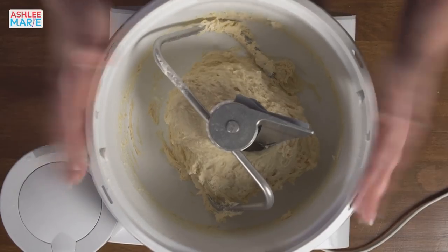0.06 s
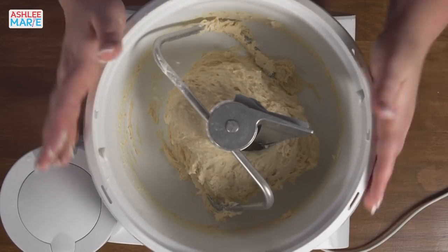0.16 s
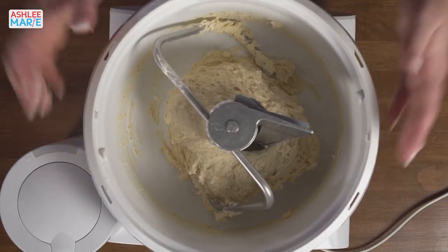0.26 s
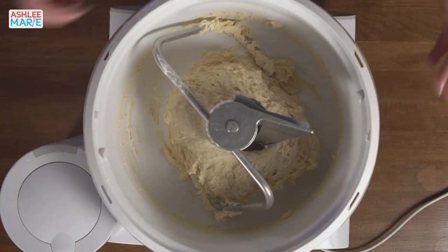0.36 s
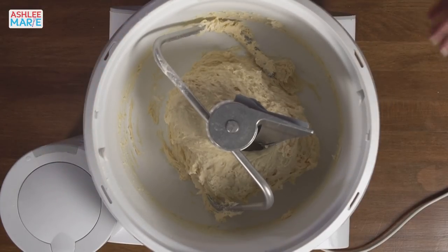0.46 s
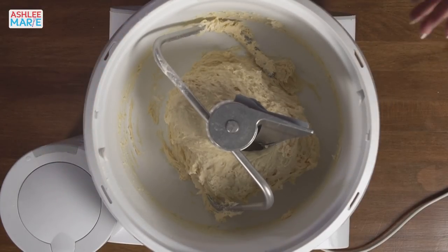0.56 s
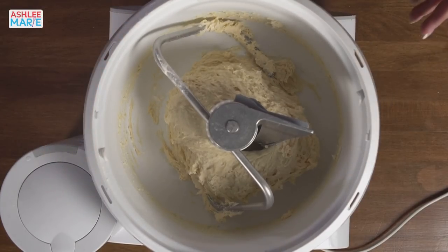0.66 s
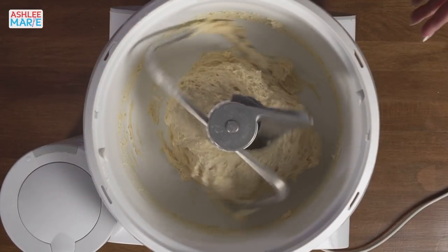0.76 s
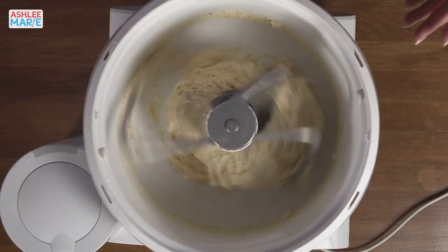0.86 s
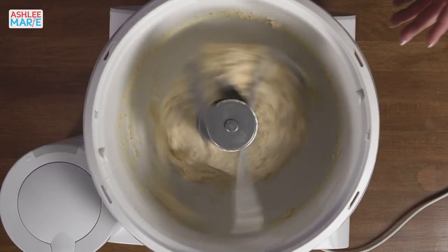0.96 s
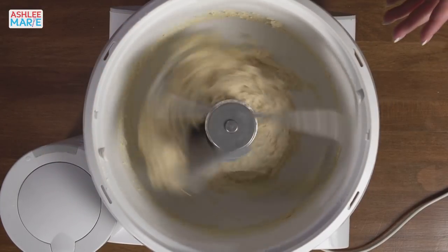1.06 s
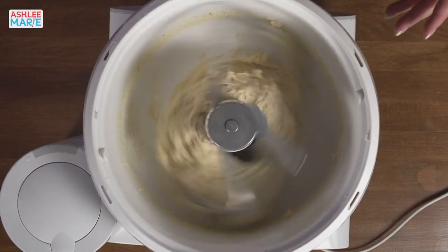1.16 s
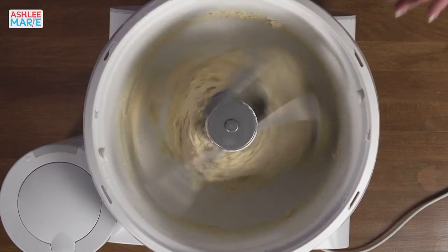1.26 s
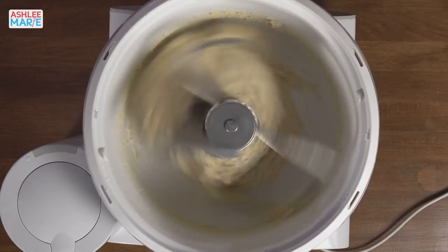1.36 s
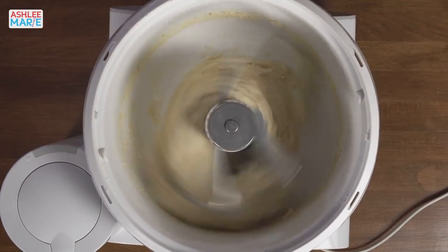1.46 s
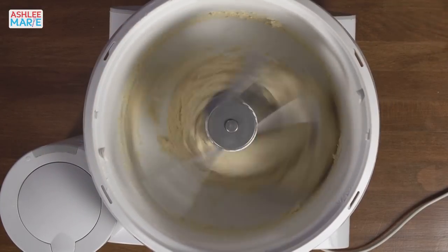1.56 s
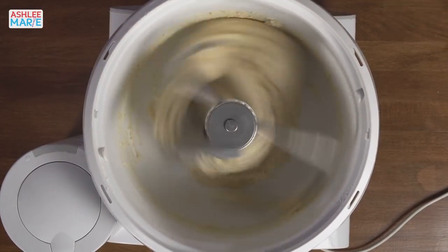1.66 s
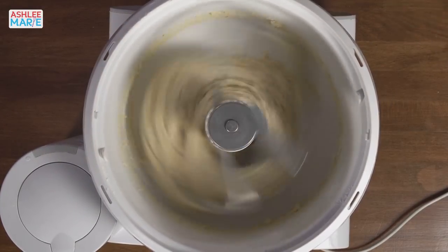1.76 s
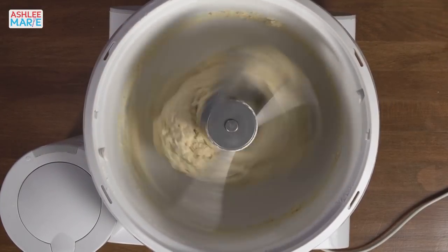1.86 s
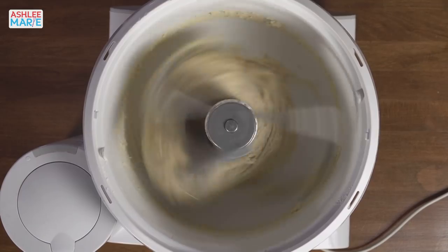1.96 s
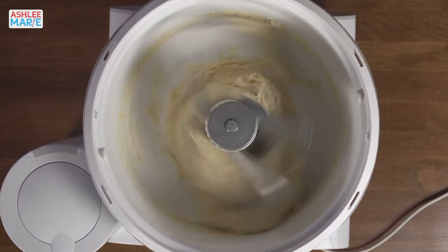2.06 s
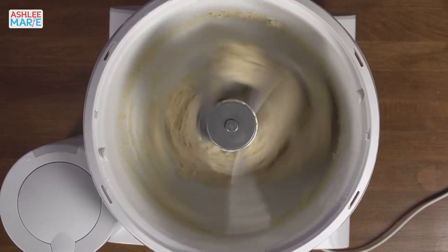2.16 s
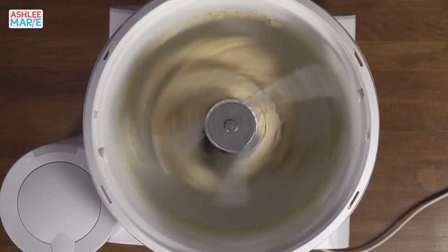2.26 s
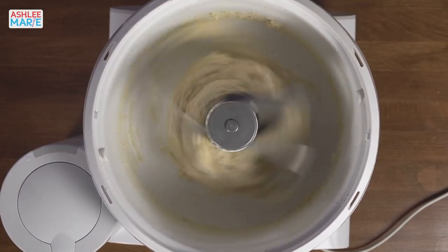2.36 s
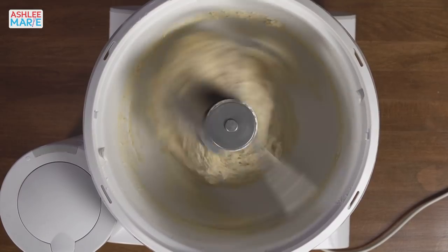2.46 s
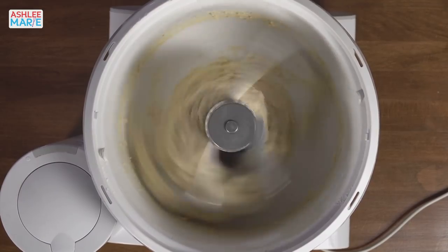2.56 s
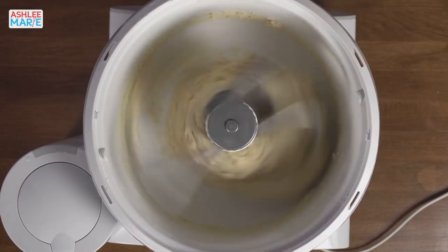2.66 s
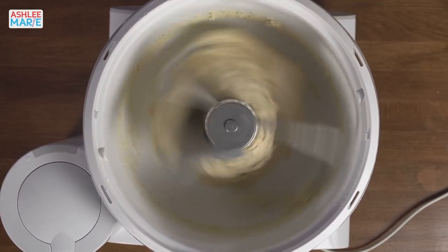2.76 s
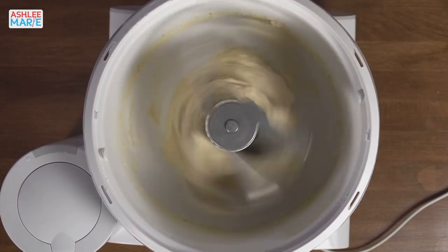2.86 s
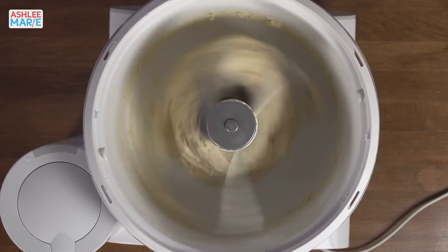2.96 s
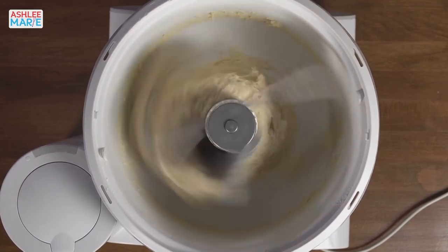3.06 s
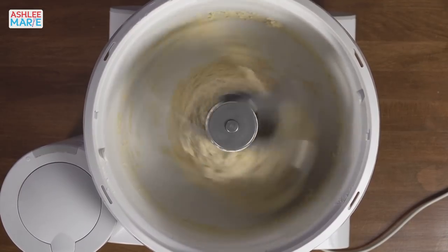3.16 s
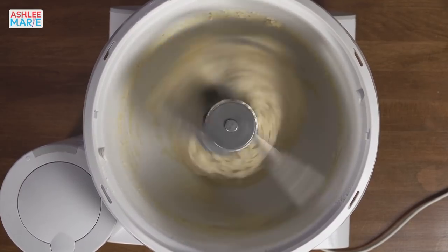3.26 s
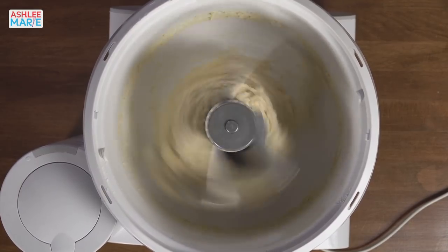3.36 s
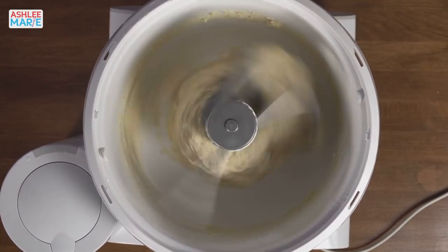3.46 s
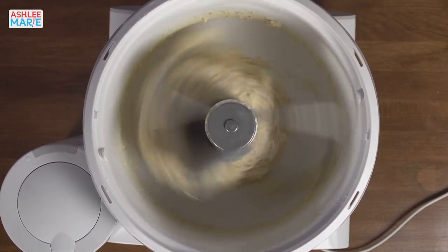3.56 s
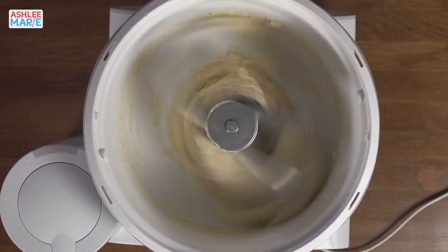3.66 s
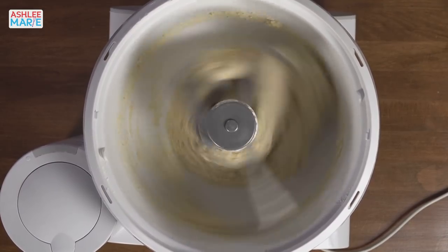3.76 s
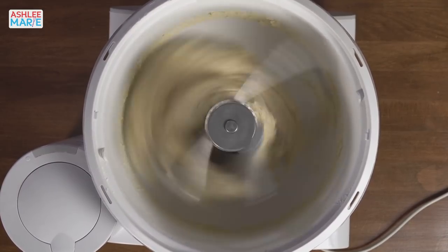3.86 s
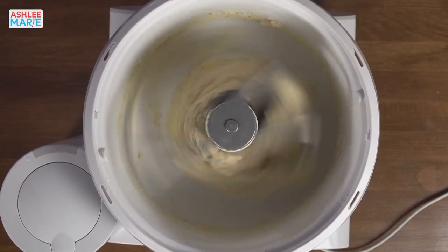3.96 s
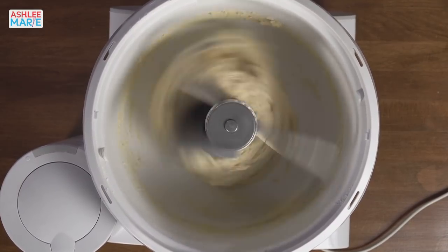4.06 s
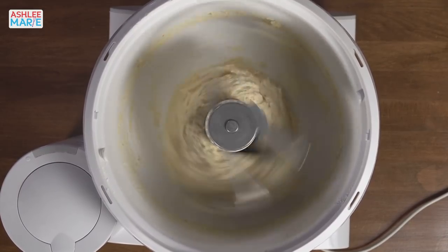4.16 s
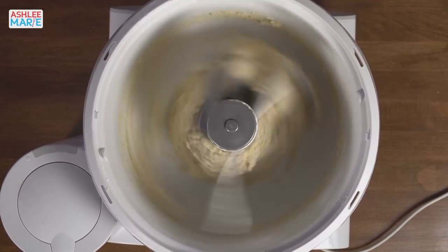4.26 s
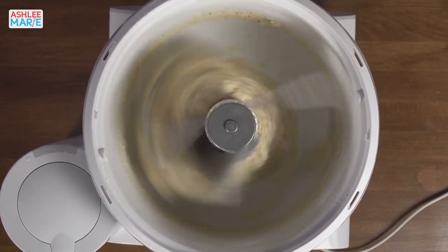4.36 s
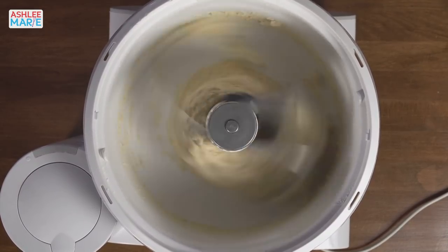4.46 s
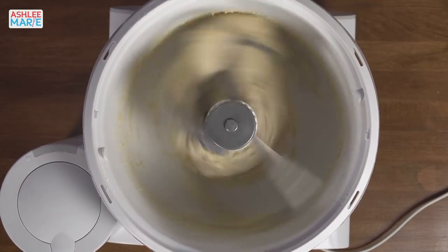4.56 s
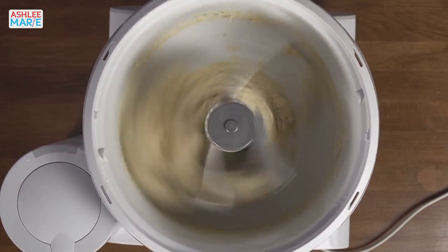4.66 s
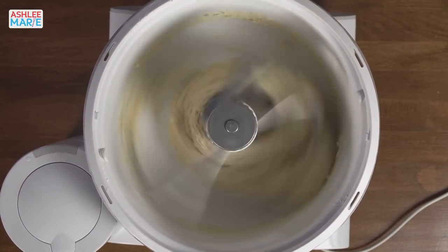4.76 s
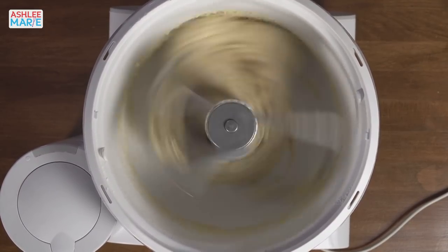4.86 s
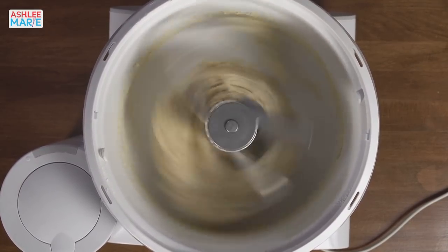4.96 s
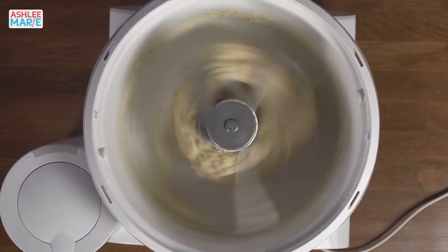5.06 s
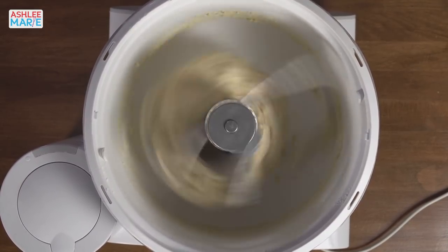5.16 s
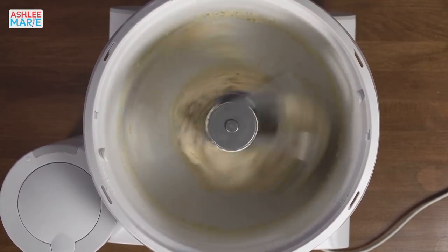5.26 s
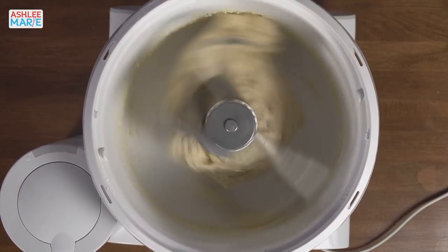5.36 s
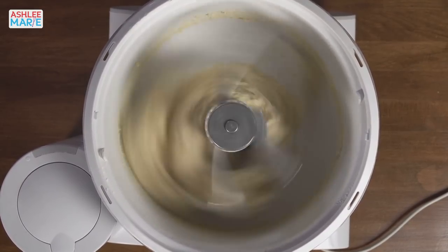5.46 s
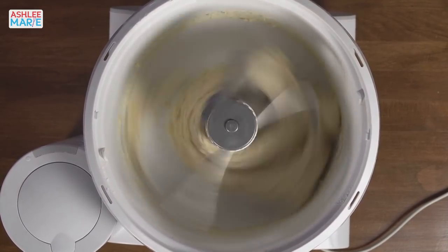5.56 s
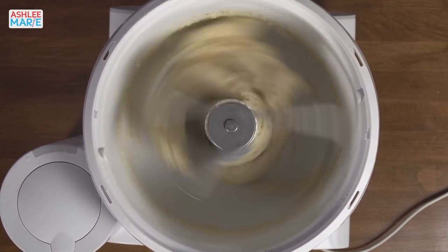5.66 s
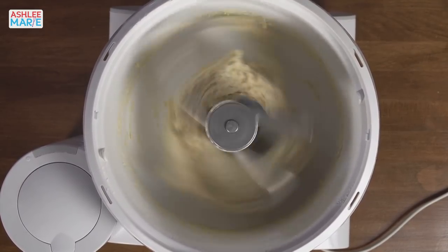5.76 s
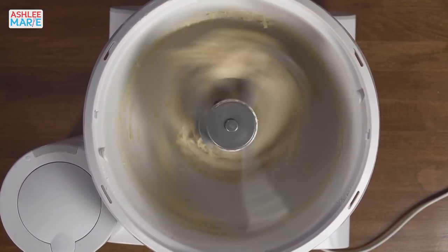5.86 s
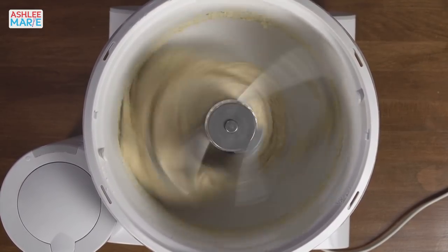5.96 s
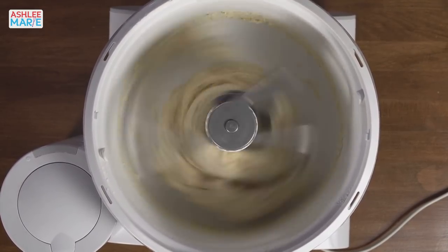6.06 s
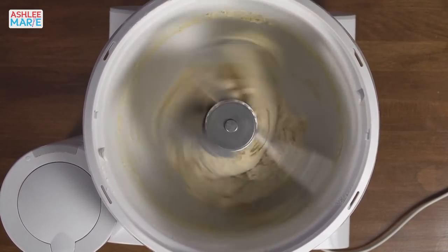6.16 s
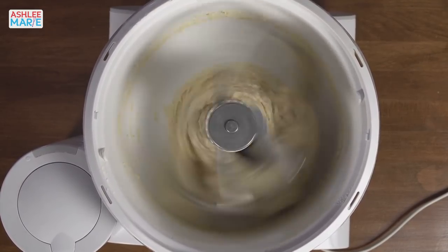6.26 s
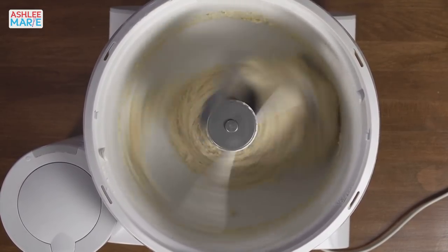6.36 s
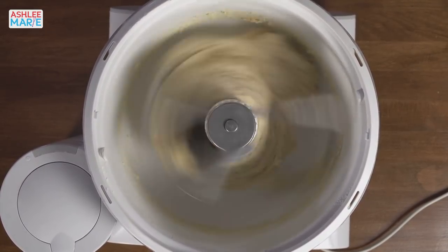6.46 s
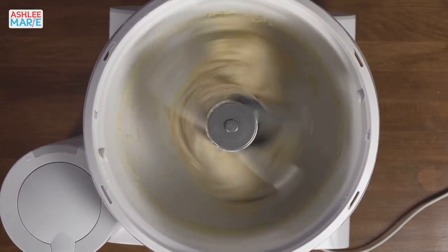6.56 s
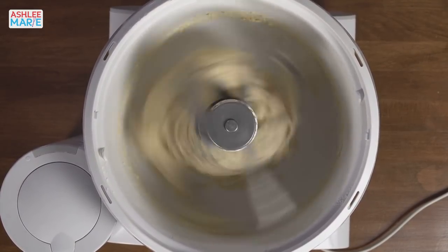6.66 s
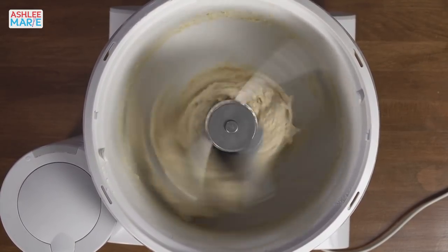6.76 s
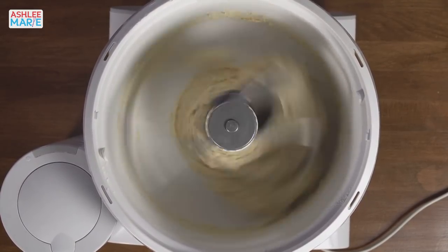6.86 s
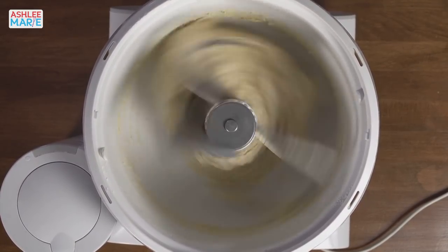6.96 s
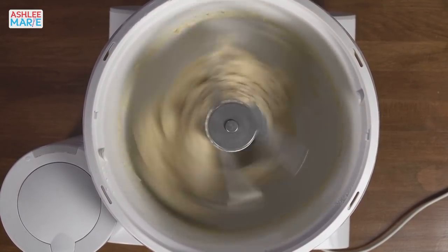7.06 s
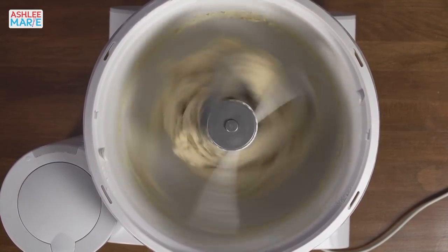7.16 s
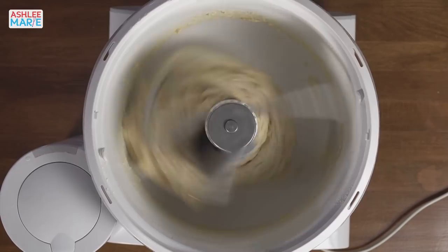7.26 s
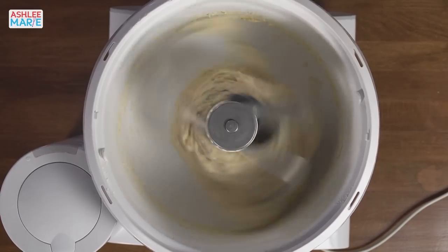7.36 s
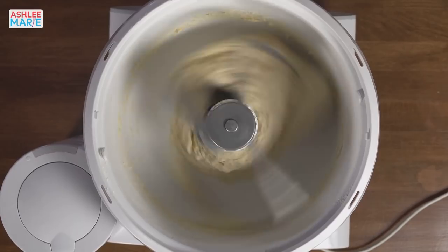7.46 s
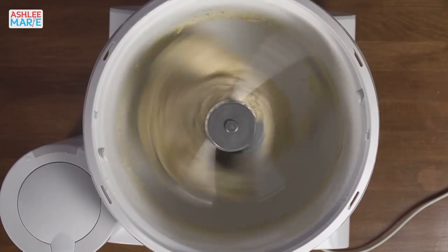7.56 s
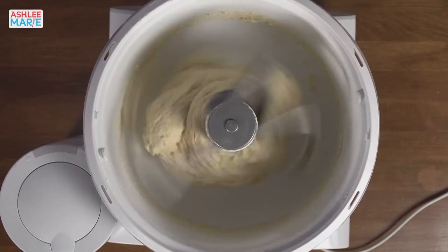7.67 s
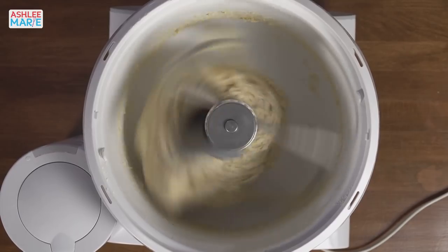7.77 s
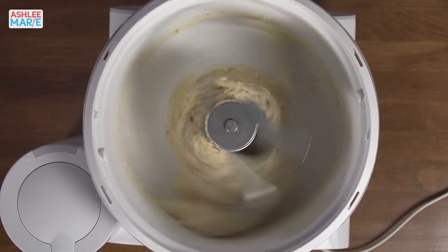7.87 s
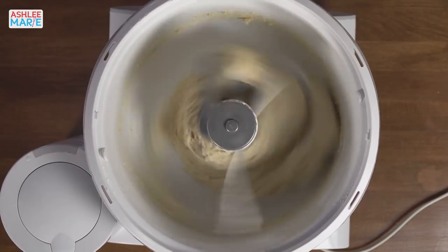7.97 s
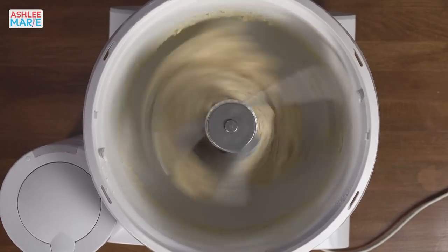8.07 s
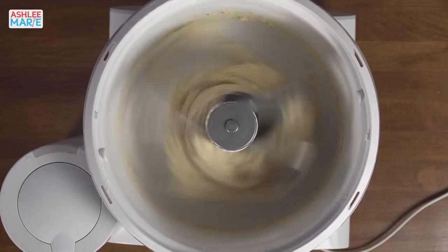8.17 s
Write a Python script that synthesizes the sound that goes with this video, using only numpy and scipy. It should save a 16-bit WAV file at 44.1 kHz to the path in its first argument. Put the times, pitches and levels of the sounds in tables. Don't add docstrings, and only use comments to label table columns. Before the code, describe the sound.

A plastic bowl snaps onto its base, a dial clicks through four steps, and a kitchen mixer whines up quickly, then kneads dough steadily.

```python
import sys
import numpy as np
from scipy import signal
from scipy.fft import rfft, irfft
from scipy.io import wavfile
from scipy.ndimage import uniform_filter1d

SR = 44100
rng = np.random.default_rng(int(sys.argv[2]) if len(sys.argv) > 2 else 0)


def boost_factor(decibels):
    exponent = np.asarray(decibels, float) / 20
    return 10 ** exponent


def dump(signal):
    limited = np.clip(np.atleast_2d(signal).T, -1, 1)
    pcm = np.round(limited * 32767).astype(np.int16)
    wavfile.write(sys.argv[1], SR, pcm)


N = 361619

# freq_hz, density_db
FLOOR_SPECTRUM = ((25, -29), (70, -26), (250, -4.5), (550, 2), (1000, 0), (2200, -3), (6000, -7.5),
                  (15500, -27))
# freq_hz, t60_s
KITCHEN_T60 = ((200, 0.33), (700, 0.35), (1700, 0.42), (4500, 0.29), (12000, 0.35))
# freq_hz, likeness_0_1
SIDE_LIKENESS = ((60, 0.046), (150, 0.62), (600, 0.41), (2400, 0.19), (4500, 0.53), (9000, 0.47),
                 (11500, 0.12), (15000, 0.29))
# freq_hz, left_minus_right_db
SIDE_LEAN = [(60, 2), (150, -2), (380, -3), (950, -7), (2380, -3), (5980, -3.5), (15000, -3.5)]
# freq_hz, density_db
TICK_SPECTRUM = [(88, -35.5), (150, -2), (985, 0.5), (1540, 1), (2230, 0), (4390, 0), (7130, -3),
                 (9360, -6.5), (15500, -18)]
# start_s, peak_db, ring_hz, left_minus_right_db, t60_s
BOWL_KNOCKS = ((.0228, -35, 3300, -21, 0.016), (.0295, -25.5, 600, -10, 0.023),
               (.0325, -8.5, 4500, -7, 0.02), (.0348, -10.5, 5430, -1, 0.019),
               (.0366, -14, 9000, 5, 0.0043), (.0368, -11, 1720, -15, 0.011),
               (.0442, -17, 870, -12.5, 0.025), (.0482, -20.5, 1500, -9, 0.036),
               (.034, -26, 384, -8, 0.042), (.037, -40.5, 184, -5, .078), (.062, -30, 1940, -13, .03),
               (.0555, -26, 740, -13, 0.021), (.475, -58, 500, -9, .05), (.525, -47.5, 1500, -13, .02),
               (.530, -49, 480, -17, 0.043), (.545, -54, 380, -10, .05))
# start_s, peak_db, ring_hz, left_minus_right_db, t60_s
DIAL_CLICKS = [
    (.6667, -19, 2190, 3.5, 0.032),
    (.677, -28, 5600, -14, 0.028),
    (.687, -28.5, 480, -16, 0.054),
    (.718, -20, 795, -2, 0.033),
    (.7292, -24, 3200, -12, 0.03),
    (.761, -23.5, 490, -14.5, .046),
    (.771, -20.5, 5740, -1.5, 0.028),
    (.800, -24.5, 6550, -7, 0.064),
]
# freq_hz, density_db
MOTOR_SPECTRUM = [(15, -50), (25, -8.5), (129, -19), (246, -4), (457, -7), (1270, -4), (1410, -5.5),
                  (2060, 4), (2420, -2), (3830, -7), (4260, 0.5), (5430, -7), (6380, -4.5), (12500, -16.5),
                  (15500, -22.5)]
# freq_hz, width_hz, gain_db
HOUSING_MODES = ((248, 28, -2), (865, 350, 2.5), (900, 110, -1), (1990, 410, -6.5), (2408, 157, -6.5),
                 (3473, 300, 5), (3880, 150, -1.5), (4140, 320, -0.5), (5170, 470, -1), (7240, 130, 4),
                 (7600, 580, -5), (3200, 150, -3), (6180, 43, 9), (6410, 45, 8), (6540, 31, 6),
                 (133, 140, 0.5))
# kneading_level_db, slope_db_per_decade_of_speed
NOISE_SPEED_LAWS = ((-40, 12), (-30, 40), (-30.5, 84))
# centre_s, speed_change_hz, half_length_s
DOUGH_LOAD = [(2.0, 3.7, .17), (2.58, 6.2, .33), (3.05, 3.3, .2), (3.4, 6.5, .4), (3.62, 3.9, .15),
              (4.29, 5.5, .4), (4.51, 1.8, .11), (4.94, -1, .13), (5.31, .6, .06), (5.59, -1.7, .17),
              (5.93, 2.3, .12), (6.01, -3.4, .14), (6.3, 1.1, .04), (6.48, 1, .05), (6.59, -2.2, .2),
              (6.77, 1, .07), (7.08, -1.4, .1), (7.3, .9, .08), (7.54, -1, .09), (7.82, 2.2, .07),
              (8.0, .3, .4)]
SHAFT_ORDERS = (1, 1.47, 2, 2.4, 3, 3.19, 3.65, 4, 4.19, 5, 6, 8, 8.4, 9, 12, 13, 15.75)
# kneading_level_db, sway_db_per_hz, ringing_speed_hz, ringing_width_hz, ringing_level_db
SHAFT_ORDER_LEVELS = ((-56, 2, 228, 42, -44.5), (-51, .7, 150, 30, -60), (-51, -.6, 120, 30, -58),
                      (-57, -1.1, 200, 60, -46), (-52, 1.2, 200, 30, -55), (-58, 2.8, 212, 25, -53),
                      (-51, .3, 245, 20, -55), (-51, .4, 228, 36, -35), (-50, -.3, 200, 30, -60),
                      (-41, -1.5, 198, 28, -42), (-52, -.3, 197, 20, -52), (-42, .5, 145, 50, -48),
                      (-57, 1.4, 140, 40, -54), (-55, -1.5, 238, 14, -42), (-46.5, -.3, 162, 90, -42),
                      (-57, .1, 237, 14, -54), (-50, -.8, 212, 14, -56))
# freq_hz, width_hz, level_db
WHINE_MODES_LEFT = [(4115, 293, -42.1), (4627, 202, -31.5), (5025, 269, -36.3), (5595, 208, -28.8),
                    (5750, 49, -30.3), (5872, 101, -27.1), (5925, 77, -24.3), (5984, 49, -27.9),
                    (6054, 50, -24.9)]
# freq_hz, width_hz, level_db
WHINE_MODES_RIGHT = [(4306, 304, -34.1), (4768, 243, -26.7), (5068, 195, -34.9), (5478, 202, -32.3),
                     (5629, 121, -30.7), (5771, 81, -25.8), (5902, 29, -33.4), (5946, 30, -24.8),
                     (5994, 36, -20.8), (6026, 59, -24.3), (6061, 31, -21.9)]
# whine_hz, left_lead_rad
WHINE_SIDE_PHASE = ((4750, 1.2), (5350, 2.4), (5912, 3.2), (5928, 6.2), (5960, 8.2), (5975, 7.1),
                    (6030, 9.1), (6060, 8.2))
# low_hz, high_hz, share_of_frames_0_1
WEAK_BANDS = ((2400, 2580, .025), (3600, 3800, .03), (3800, 4050, .03), (4750, 5150, .06),
              (5150, 5500, .11), (5350, 5600, .04), (12900, 13500, .06), (14000, 14600, .04))

MAINS_HZ, KNEAD_HZ = 120, 257
IDLE_HZ = 127
COMMUTATOR_BARS = 23
START_S, TOP_HZ = .644, 258.3
QUICK_SHARE, QUICK_S, SLOW_S = .843, .234, 1.27
TONE_DB_PER_DECADE = 160


def evened(x):
    return x / np.sqrt(np.mean(x ** 2) + 1e-20)


def read(points, hz):
    f, value = np.transpose(points)
    return np.interp(np.log(hz + 1), np.log(f + 1), value)


def sided(x, pan_db):
    return np.array([x * boost_factor(pan_db / 2), x * boost_factor(-pan_db / 2)])


def wander(span):
    smooth = uniform_filter1d(rng.standard_normal(N), int(span))
    return evened(uniform_filter1d(smooth, int(span)))


def standing(modes, hz):
    power = sum(boost_factor(2 * db) / (1 + (2 * (hz - f) / w) ** 2) ** 2 for f, w, db in modes)
    return 10 * np.log10(power)


def noise(colour_db, patchy_db):
    frames, hz = N // 256 + 5, np.fft.rfftfreq(1024, 1 / SR)
    a, b, c, d, patches = rng.standard_normal((frames, 513, 5)).T
    patches = uniform_filter1d(patches, size=8, axis=0)
    patches = evened(uniform_filter1d(patches, size=12, axis=1))
    same = np.clip(read(SIDE_LIKENESS, hz), 0, 1)[:, None]
    left = a + 1j * b
    delay = np.exp(-9j * np.pi * hz / SR)[:, None]
    right = delay * (same * left + np.sqrt(1 - same ** 2) * (c + 1j * d))
    level = boost_factor(colour_db(hz)[:, None] + patchy_db * patches)
    z = np.array([left, right]) * sided(level, read(SIDE_LEAN, hz)[:, None])
    return evened(signal.istft(z, nperseg=1024, noverlap=768)[1][:, :N])


def quiet_floor(t):
    floor = boost_factor(-66) * noise(lambda hz: read(FLOOR_SPECTRUM, hz), patchy_db=1)
    rub = 1 + 1.6 * np.clip((t - .6) / 0.087, 0, 1)
    return floor * rub * np.clip(t / .022, .8, 1)


def kitchen(x):
    taps = np.zeros((2, SR))
    at = np.arange(300, SR - 20, 20) + rng.integers(0, 20, (2, (SR - 301) // 20))
    np.put_along_axis(taps, at, rng.choice([-1., 1.], at.shape), 1)
    hz, t, z = signal.stft(taps, SR, nperseg=256)
    decay = boost_factor(-60 * t / read(KITCHEN_T60, hz)[:, None])
    tail = signal.istft(z * decay, SR, nperseg=256)[1]
    return signal.fftconvolve(x, tail / np.linalg.norm(tail[0]), axes=1)[:, :N]


def hits(rows, ringing, per_octave):
    t, out = np.arange(4000) / SR, np.zeros((2, N + 4000))
    colour = boost_factor(read(TICK_SPECTRUM, np.fft.rfftfreq(4000, 1 / SR)))
    for start_s, peak_db, ring_hz, pan_db, t60_s in rows:
        common, *own = rng.standard_normal((3, 4000))
        tick = evened(irfft(rfft(common + 0.58 * np.array(own)) * colour))
        cluster = sum(np.sin(2 * np.pi * near * ring_hz * t) for near in (.84, 1, 1.21))
        ring = 0.58 * cluster + 0.27 * np.sin(2 * np.pi * 1.6 * ring_hz * t)
        share = np.clip(ringing - per_octave * np.log2(ring_hz / 1000), 0, .95)
        envelope = boost_factor(peak_db - 60 * t / max(t60_s, .003)) * np.minimum(t / 0.00058, 1)
        hit = (0.66 * (1 - share) * tick + share * ring) * envelope
        out[:, round(start_s * SR):][:, :4000] += hit * boost_factor([[pan_db / 2], [-pan_db / 2]])
    return out[:, :N]


def shaft_speed(t):
    u = np.maximum(t - START_S, 0)
    lag = QUICK_SHARE * np.exp(-u / QUICK_S) + (1 - QUICK_SHARE) * np.exp(-u / SLOW_S)
    sway = sum(hz * np.exp(-((t - s) / half) ** 2) for s, hz, half in DOUGH_LOAD)
    return 1e-3 + TOP_HZ * (1 - lag) + sway


def magnetic_hum(t, speed):
    level = boost_factor(-59 + 12 * (1 - speed / 258) + 1.7 * wander(2100))
    return np.sqrt(2) * sided(level * np.cos(4 * np.pi * MAINS_HZ * t), -11.5)


def housing_noise(lo_hz, hi_hz):
    def colour_db(hz):
        peaks_db = sum(db / (1 + (2 * (hz - f) / w) ** 2) for f, w, db in HOUSING_MODES)
        edges = 1 / (1 + (lo_hz / (hz + 1)) ** 4) / (1 + (hz / hi_hz) ** 4)
        return read(MOTOR_SPECTRUM, hz) + peaks_db + 10 * np.log10(edges)
    return noise(colour_db, patchy_db=1.21)


def motor_noise(t, turns, speed):
    decades = np.log10(np.maximum(speed, IDLE_HZ) / KNEAD_HZ)
    rumble_db, roar_db, hiss_db = (db + slope * decades for db, slope in NOISE_SPEED_LAWS)
    waking = np.clip((.835 - t) / 0.21, 0, 1)
    rumble = boost_factor(rumble_db - 3.5 * waking + 4.5) * housing_noise(146, 1160)
    sub_rumble = boost_factor(-56.5 + 120 * np.log10(speed / 258)) * housing_noise(5, 118)
    roar = boost_factor(roar_db - 9 * waking + 2.5) * housing_noise(910, 5630)
    hiss = boost_factor(hiss_db - 12 * waking + 5.5) * housing_noise(4800, 40000)
    pulse = 1 + 0.022 * np.cos(2 * np.pi * MAINS_HZ * t) + 0.05 * np.cos(2 * np.pi * turns)
    grit = boost_factor(0.47 * wander(31) + 0.27 * wander(1500))
    return rumble + sub_rumble + pulse * grit * (roar + hiss)


def shaft_orders(turns, speed):
    out = np.zeros((2, N))
    climb_db = TONE_DB_PER_DECADE * np.log10(np.minimum(speed / KNEAD_HZ, 1))
    faint_db = -15 * np.clip((115 - speed) / 40, 0, 1)
    blur = 1 + 5.3 * (1 - speed / 258)
    for k, (knead_db, sway_db, *ring) in zip(SHAFT_ORDERS, SHAFT_ORDER_LEVELS):
        steady = boost_factor(knead_db + climb_db + sway_db * np.maximum(speed - KNEAD_HZ, -2))
        level = np.hypot(steady, boost_factor(standing([ring], speed))) * boost_factor(faint_db)
        phase = 2 * np.pi * (k * turns + rng.random()) + 0.042 * k * blur * wander(470)
        apart = .85 * min(k / 4, 1) * wander(4500)
        out += sided(level * boost_factor(2.65 * wander(900)), -5.5) * np.cos([phase + apart, phase])
    return np.sqrt(2) * out


def commutator_whine(turns, speed):
    bar_hz = COMMUTATOR_BARS * speed
    left_db = standing(WHINE_MODES_LEFT, bar_hz) - .3 + 1.85 * wander(500)
    right_db = standing(WHINE_MODES_RIGHT, bar_hz) - .3 + 1.5 * wander(490)
    jitter_rad = .063 + 1.5 * np.clip(1 - speed / 250, 0, 1)
    phase = 2 * np.pi * COMMUTATOR_BARS * turns + jitter_rad * wander(200)
    lead = np.interp(bar_hz, *np.transpose(WHINE_SIDE_PHASE))
    return np.sqrt(2) * boost_factor([left_db, right_db]) * np.cos([phase + lead, phase])


def motor(t):
    speed = shaft_speed(t)
    turns = np.cumsum(speed) / SR
    tones = magnetic_hum(t, speed) + shaft_orders(turns, speed) + commutator_whine(turns, speed)
    switched_on = np.clip((t - .668) / .03, 0, 1)
    return switched_on * (tones + motor_noise(t, turns, speed))


def scene():
    t = np.arange(N) / SR
    knocks = hits(BOWL_KNOCKS, ringing=0.68, per_octave=0.14)
    clicks = hits(DIAL_CLICKS, ringing=0.35, per_octave=.06)
    struck = knocks + clicks
    return quiet_floor(t) + struck + boost_factor(-9) * kitchen(struck) + motor(t)


def band_dropouts(x):
    hz, t, z = signal.stft(x, SR, nperseg=1024, noverlap=768)
    for lo_hz, hi_hz, share in WEAK_BANDS:
        from_s = 2.5 if 5100 < lo_hz < 6000 else .9
        empty = np.repeat(rng.random(len(t) // 4 + 1) < share, 4)[:len(t)] & (t > from_s)
        empty = np.convolve(empty, np.ones(3), "same") > 0
        in_band = ((hz > lo_hz) & (hz < hi_hz))[:, None]
        z = z * np.where(in_band & empty, .02, 1)
    return signal.istft(z, SR, nperseg=1024, noverlap=768)[1][:, :N]


def low_pass(x):
    return signal.sosfilt(signal.butter(12, 15180, fs=SR, output="sos"), x)


def record(dry):
    lowpass = signal.firwin(511, 15600, window=("kaiser", 9), fs=SR)
    limited = signal.oaconvolve(band_dropouts(dry), lowpass[None], "same")
    settle = np.array([[0], [-.0103]]) * np.exp(-np.arange(N) / SR / .15)
    return low_pass(limited + settle)


dry = scene()
out = record(dry)
dump(out)
```